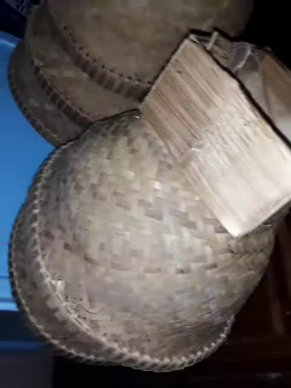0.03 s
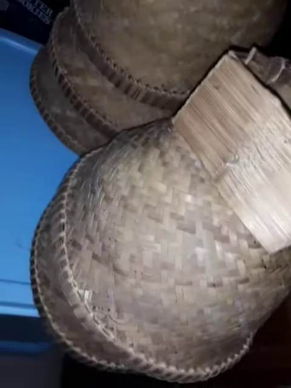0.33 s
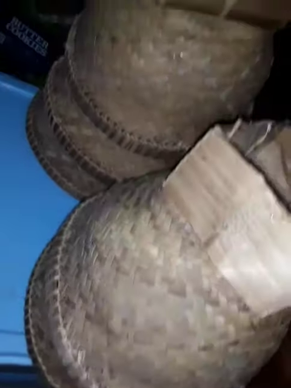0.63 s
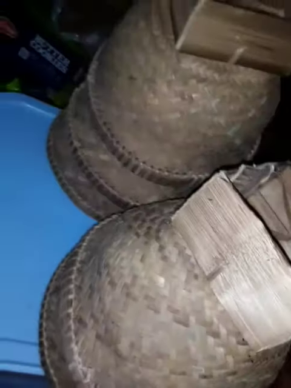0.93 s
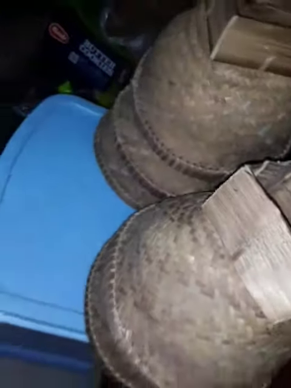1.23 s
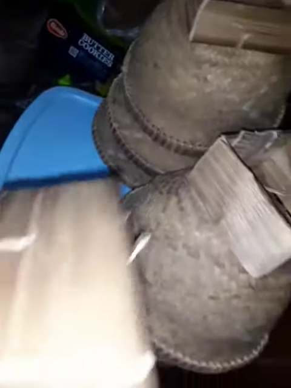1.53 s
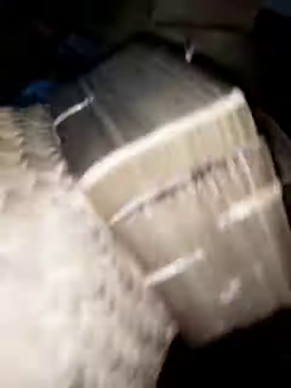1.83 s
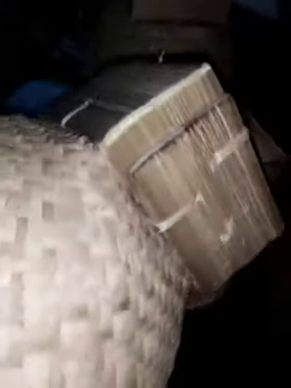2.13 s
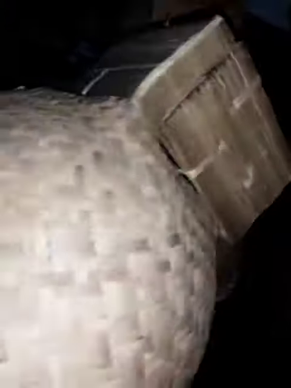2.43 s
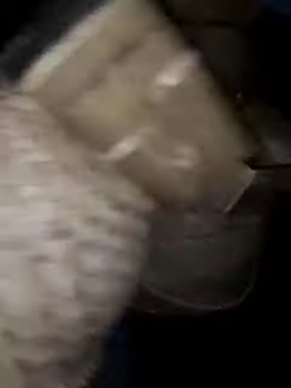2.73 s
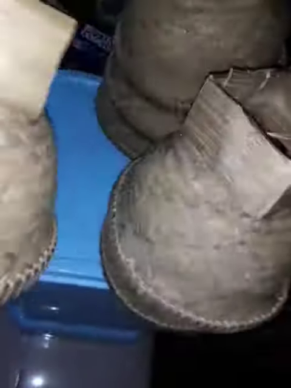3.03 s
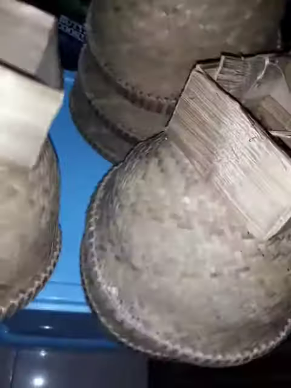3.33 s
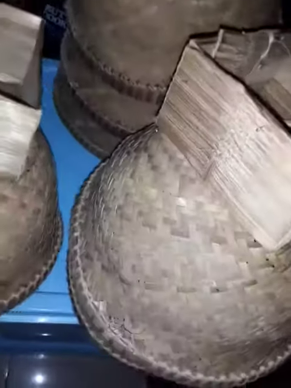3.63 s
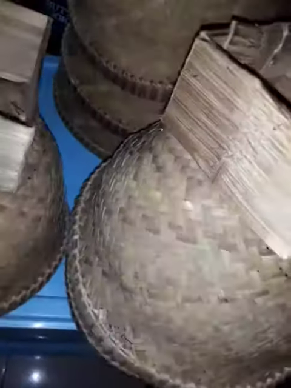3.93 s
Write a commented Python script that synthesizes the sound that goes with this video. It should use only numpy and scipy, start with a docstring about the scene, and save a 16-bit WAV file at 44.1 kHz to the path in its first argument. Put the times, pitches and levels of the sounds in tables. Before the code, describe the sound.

Close by in a small room, a woven basket gives dry clicks and soft rustles as it is handled, then knocks down onto a hollow plastic lid and rocks briefly. Faint, high insect chirping continues behind it.

```python
"""Insects chirp outside a small room while woven bamboo baskets are handled close to the microphone.
A faint brush comes first. From about 1.2 s one basket is picked up and turned: its strips tap and
rub, and single fibres snap. Near 3.6 s it is set down on a hollow plastic lid, which thumps and
rings under the crunching weave. The basket rocks, its rim groans softly, and it settles."""
import sys
import numpy as np
from scipy import signal
from scipy.fft import rfft, irfft
from scipy.io import wavfile

SR = 44100
rng = np.random.default_rng(int(sys.argv[2]) if len(sys.argv) > 2 else 0)


def unload_wav(signal):
    """Save mono or channel-first audio to the path in sys.argv[1] as 16-bit WAV at rate SR, clipped to [-1, 1]."""
    wavfile.write(
        sys.argv[1],
        SR,
        np.round(np.clip(np.atleast_2d(signal).T, -1, 1) * 32767).astype(np.int16),
    )


N = 176400
T = np.arange(N) / SR

# tone curves of room air, hiss, insect chorus, chirper, reverb and weave crunch: freq_hz, level_db
AIR_SPECTRUM = [(20, -35), (45, 1.5), (100, -5.5), (290, -5.5), (480, -6), (800, -9), (1200, -14),
                (2700, -21), (4400, -23), (5800, -19), (8000, -51), (9000, -45.5), (16000, -35)]
HISS_SPECTRUM = [(5000, -2), (8300, -50.5), (9500, -5), (12000, 2.5), (15500, 6.5)]
CHORUS_SPECTRUM = [(5500, -26), (6000, -13.5), (6500, 3.5), (6900, 7.5), (7250, 2.5), (7600, 3.5),
                   (7850, -4), (8100, -18.5), (8800, -18)]
CHIRP_SPECTRUM = [(6000, -65), (6450, -4.5), (6700, -13), (6930, -2.5), (7050, 6), (7250, -47),
                  (7600, -47.5)]
ROOM_SPECTRUM = [(60, -32), (300, -3.5), (700, 3.5), (2000, -0.5), (5000, -4), (9000, -11), (16000, 1.5)]
CRUNCH_SPECTRUM = [(150, 12.5), (450, 1.5), (900, -7), (1900, -11.5), (2700, -20), (4200, -29),
                   (7000, -18.5), (9000, -37), (15000, -22.5)]
# level ride of the hiss: time_s, level_db
HISS_RIDE = [(0, -71), (1.15, -70), (1.3, -67), (1.65, -64.5), (2.0, -67), (2.45, -70), (2.8, -67),
             (3.3, -65), (4.0, -66)]
# partials of an insect's steady trill: pitch_hz, level_db
TRILL_PARTIALS = [(7407, -95.5), (7558, -77.5), (7606, -86), (7654, -84.5)]
# a lower insect's occasional buzzes: middle_s, half_length_s, level_db
INSECT_BUZZES = [(.3, 0.15, -83), (0.533, 0.051, -71.5), (0.954, 0.17, -82.5), (2.56, 0.065, -75),
                 (3.005, 0.11, -83)]
# the weave brushing hand and lid: middle_s, half_length_s, level_db, colour_hz
WEAVE_BRUSHES = [(0.542, 0.085, -71.5, 5000), (1.264, 0.058, -68.5, 4270), (1.544, 0.1, -68, 5000),
                 (1.546, 0.084, -69.5, 980), (1.673, 0.032, -66, 636), (1.768, 0.13, -69, 417),
                 (1.592, 0.49, -74.5, 150), (1.657, 0.02, -74, 2400), (2.54, 0.085, -72, 4250),
                 (2.747, 0.068, -69.5, 6000), (2.964, 0.06, -64.5, 5100), (2.95, .06, -69.5, 13000),
                 (3.026, 0.068, -74.5, 1420), (3.066, 0.077, -71.5, 606), (3.243, 0.08, -75.5, 3200),
                 (3.509, 0.037, -65, 4600), (3.713, 0.025, -62.5, 5700), (3.71, .08, -66.5, 14100),
                 (3.9, 0.27, -68, 5940), (3.992, 0.025, -67, 12900)]
# dry taps of the weave: start_s, level_db, colour_hz, t60_s, colour_q
WEAVE_TAPS = [(1.214, -56.5, 1870, 0.059, 3.6), (1.215, -59, 656, .06, 1.2),
              (1.2135, -51.5, 3650, 0.028, 4), (1.227, -48, 4170, 0.034, 1), (1.243, -58, 3380, .06, 0.89),
              (1.5993, -41.5, 3200, 0.022, 0.33), (1.601, -40.5, 1670, 0.042, 0.84),
              (1.603, -52.5, 248, 0.075, 1.1), (1.605, -44, 810, 0.039, 3.5),
              (1.655, -51.5, 2870, .06, 0.7), (1.681, -54, 1590, 0.031, 1.2),
              (1.8137, -47, 2120, 0.047, 3.4), (1.834, -53.5, 2940, 0.027, 1.3),
              (1.851, -54.5, 2250, 0.058, 0.71), (2.1564, -40, 5600, 0.055, 3.9),
              (2.160, -42, 2530, 0.059, 2.7), (2.161, -49, 1130, 0.036, 2.7),
              (2.172, -42.5, 3350, 0.027, 0.9), (2.196, -53, 2410, 0.054, 0.78),
              (2.452, -64, 2780, 0.056, 1.5), (2.528, -54.5, 5240, .035, 1.6), (3.209, -63, 2430, 0.12, 1),
              (3.5635, -43, 6130, 0.041, 3), (3.858, -54.5, 1800, 0.04, 0.71)]
# modes of the basket: pitch_hz, gain_db, t60_s (capped in taps)
BASKET_MODES = [(780, -5, 0.15), (1093, -1.5, 0.029), (1500, 1, 0.091), (2030, 5, 0.02), (2300, -7, 0.023),
                (2620, -14, 0.054), (2880, -12, 0.089), (3504, 1.5, 0.057), (5500, -45, 0.14)]
# single fibres snapping: start_s, level_db, pitch_hz
FIBRE_SNAPS = [(1.408, -41, 13100), (1.6955, -34, 10200), (1.701, -40, 10200), (1.727, -43, 7000),
               (1.744, -42, 6800), (1.744, -42, 13000), (1.8143, -31, 7000), (1.8161, -36.5, 11600),
               (1.83, -39, 12600), (2.158, -30.5, 13500), (3.567, -26.5, 6100), (3.571, -26, 5770),
               (3.5728, -26.5, 12400), (3.612, -40.5, 7400), (3.858, -42.5, 6350)]
# the rim rubbing as the basket settles: middle_s, half_length_s, level_db
RIM_SWAYS = [(3.773, .014, -55.5), (3.817, 0.0092, -58), (3.84, 0.0087, -46), (3.884, 0.013, -50),
             (3.959, 0.012, -57.5)]
# the basket knocking on the lid: start_s, strength_db, hardness_hz, crunch_db
LID_KNOCKS = [(3.57, -21.5, 121, -42), (3.5801, -24, 400, -37), (3.603, -27, 1110, -35.5),
              (3.609, -22.5, 340, -41), (3.62, -20, 280, -49.5), (3.638, -32.5, 1200, -37),
              (3.644, -26, 287, -51), (3.665, -30.5, 700, -40.5), (3.6705, -29, 440, -42),
              (3.684, -39.5, 500, -44), (3.707, -35.5, 294, -46.5), (3.733, -48, 300, -58),
              (3.828, -36.5, 248, -72), (3.845, -37, 202, -72), (3.858, -41.5, 300, -56),
              (3.957, -46, 250, -68)]
# modes of the hollow lid: pitch_hz, gain_db, t60_s (capped in knocks)
LID_MODES = [(65, -24, 0.36), (86.8, -3, 0.21), (110.7, -9.5, 0.31), (140.5, -5.5, 0.32), (174, -24, 0.32),
             (195.5, -14.5, 0.29), (218, -28, 0.15), (260.2, -0.5, 0.35), (292, -10, 0.23),
             (357, -26, 0.28), (416, -18, 0.44), (568, -15, 0.18), (754, -20, 0.3), (893, -17, 0.17)]
# faint lingering ring of things on the lid: pitch_hz, level_db, t60_s
LINGERING_MODES = [(1028, -63, 0.9), (1980, -69, 1.9), (2040, -78, 5.9), (3340, -66, 0.63),
                   (3380, -66, 0.94)]


def from_db(db):
    """Decibels to gain."""
    return 10 ** (np.asarray(db) / 20)


def rms_one(x):
    """Scale to unit rms."""
    return x / np.sqrt(np.mean(x ** 2) + 1e-20)


def noise(spectrum, size=N):
    """Unit noise shaped by a tone curve, cut below its first point and held flat above its last."""
    hz, db = np.transpose(spectrum)
    log_hz = np.log(np.fft.rfftfreq(size, 1 / SR) + 1)
    gain = from_db(np.interp(log_hz, np.log(hz), db, left=-90))
    return rms_one(irfft(rfft(rng.standard_normal(size)) * gain, size))


def wide(spectrum, width, size=N):
    """Stereo noise; width is side over mid."""
    return noise(spectrum, size) + width * noise(spectrum, size) * np.array([[1], [-1]])


def band(hz, q, size=N):
    """Unit noise through one resonance."""
    w = 2 * np.pi * min(hz, .42 * SR) / SR
    a = np.sin(w) / (2 * q)
    return rms_one(signal.lfilter([a, 0, -a], [1 + a, -2 * np.cos(w), 1 - a], rng.standard_normal(size)))


def drift(rate_hz):
    """Wander gliding between random values of unit spread."""
    return np.interp(T * rate_hz, np.arange(4000), rng.standard_normal(4000))


def fade(t60, size=N):
    """Exponential decay, 60 dB down after t60 seconds."""
    return np.exp(-np.log(1000) * T[:size] / t60)


def swell(middle_s, half_s):
    """A bell-shaped rise and fall."""
    return np.exp(-((T - middle_s) / half_s) ** 2 / 2)


def ring(x, hz, t60):
    """One mode: a unit click sets a sine of height 1 ringing."""
    r, w = np.exp(-np.log(1000) / (t60 * SR)), 2 * np.pi * hz / SR
    return signal.lfilter([0, np.sin(w)], [1, -2 * r * np.cos(w), r * r], x + 1e-18)


def add(track, start_s, sound):
    """Drop a sound onto a track."""
    i = int(start_s * SR)
    track[i:i + len(sound)] += sound[:N - i]


def background():
    """A bed of low room air and fine high hiss."""
    air = from_db(-67.5 + .33 * drift(8.85)) * wide(AIR_SPECTRUM, width=.17)
    hiss = from_db(np.interp(T, *np.transpose(HISS_RIDE))) * wide(HISS_SPECTRUM, width=.41)
    return air + hiss


def insects(chirp_period_s=.12, first_peak_s=.079):
    """One even chirper, a thin steady trill and a lower buzz over a distant chorus."""
    throb = (.5 + .5 * np.cos(2 * np.pi * (T - first_peak_s) / chirp_period_s)) ** 1.55
    chirp = from_db(-64 + .27 * drift(6.02)) * throb * noise(CHIRP_SPECTRUM)
    waver_hz = 7 * drift(30)
    trill = sum(from_db(db + 2 * drift(14)) * np.sin(2 * np.pi * np.cumsum(hz + waver_hz) / SR)
                for hz, db in TRILL_PARTIALS)
    buzz = band(hz=4345, q=35) * sum(from_db(db) * swell(s, half) for s, half, db in INSECT_BUZZES)
    chorus = from_db(-67) * wide(CHORUS_SPECTRUM, width=.0067)
    return chirp + trill + buzz + chorus


def room(send, t60=.3, build_s=.009, size=30000):
    """A short diffuse tail, building up over the first reflections."""
    envelope = fade(t60, size) * (1 - np.exp(-T[:size] / build_s))
    tail = wide(ROOM_SPECTRUM, width=.033, size=size) * envelope
    tail /= np.sqrt(np.sum(tail[0] ** 2))
    return signal.fftconvolve(send[None], tail, axes=1)[:, :N]


def brushes(grain_db=1.5):
    """The weave slides against hand and lid in soft swells of grainy friction."""
    friction = sum(from_db(db) * band(hz, q=1.57) * swell(s, half) for s, half, db, hz in WEAVE_BRUSHES)
    return friction * from_db(grain_db * drift(250))


def sways(pitch_hz=254):
    """Soft, hollow groans of the rim rubbing on the lid."""
    lowpass = signal.butter(2, 3 * pitch_hz, fs=SR, output="sos")
    rub = signal.sosfilt(lowpass, band(pitch_hz, q=7.3))
    return rub * sum(from_db(db) * swell(s, half) for s, half, db in RIM_SWAYS)


def taps(body_db=-6.5, max_t60_s=.06, size=6000):
    """Each tap is a short crush of strips that also rings the basket's modes."""
    crush = np.zeros(N)
    for start_s, db, colour_hz, t60, q in WEAVE_TAPS:
        burst = band(colour_hz, q, size) * fade(t60, size)
        lowpass = signal.butter(1, min(1.47 * colour_hz, SR / 2 - 1000), fs=SR)
        add(crush, start_s, from_db(db) * signal.lfilter(*lowpass, burst))
    body = sum(from_db(db) * ring(crush, hz, min(t60, max_t60_s)) / np.sqrt(t60 * SR)
               for hz, db, t60 in BASKET_MODES)
    return crush + from_db(body_db) * body


def snaps(ring_cycles=17.6, grit_db=-19.5, size=2000):
    """Fibres let go with a tiny, high tick and a trace of grit."""
    track = np.zeros(N)
    for start_s, db, hz in FIBRE_SNAPS:
        tick = np.sin(2 * np.pi * hz * T[:size]) * fade(ring_cycles / hz, size)
        grit = from_db(grit_db) * band(hz, q=8.7, size=size) * fade(t60=.012, size=size)
        add(track, start_s, from_db(db) * (tick + grit))
    return track


def knocks(lid_db=-5.5, max_t60_s=.26, thump_db=-3.5, thump_hz=162, linger_start_s=3.603):
    """Padded blows thump and ring the lid, the weave crunches under each, and a faint ring lingers."""
    force, crunch, linger = np.zeros((3, N))
    for start_s, db, hardness_hz, crunch_db in LID_KNOCKS:
        push = T[:2000] * np.exp(-2 * np.pi * hardness_hz * T[:2000])  # harder is shorter and brighter
        add(force, start_s, -from_db(db) * push / push.sum())
        burst = noise(CRUNCH_SPECTRUM, size=6000) * fade(t60=.08, size=6000)
        add(crunch, start_s, from_db(crunch_db) * burst)
    jolt = np.diff(force, prepend=0) * SR / (2 * np.pi)
    lid = sum(from_db(db + lid_db) * ring(jolt / hz, hz, min(t60, max_t60_s))
              for hz, db, t60 in LID_MODES)
    thump = from_db(thump_db) * ring(jolt / thump_hz, thump_hz, t60=.049)
    for hz, db, t60 in LINGERING_MODES:
        add(linger, linger_start_s, from_db(db) * np.sin(2 * np.pi * hz * T) * fade(t60))
    return lid + thump + crunch + linger


def scene():
    """Basket and lid up front with a touch of room, over the insects and the background."""
    weave = taps() + snaps()
    lid = knocks() + sways()
    reverb_send = from_db(-8.5) * weave + from_db(-14) * lid
    return weave + lid + brushes() + room(reverb_send) + insects() + background()


def record(dry):
    """The microphone loses the deep bass; the very top is cut steeply."""
    low_cut = signal.butter(7, 43, "high", fs=SR, output="sos")
    high_cut = signal.ellip(10, .2, 70, 15900, fs=SR, output="sos")
    return signal.sosfilt(high_cut, signal.sosfilt(low_cut, dry))


dry = scene()
out = record(dry)
unload_wav(out)
```